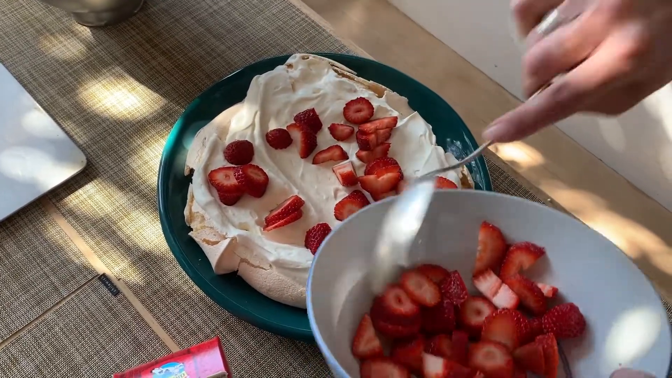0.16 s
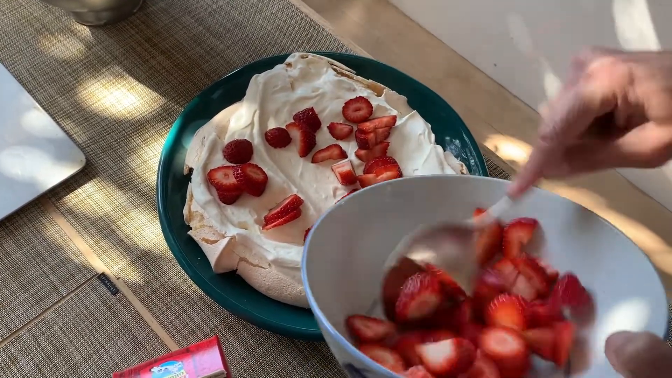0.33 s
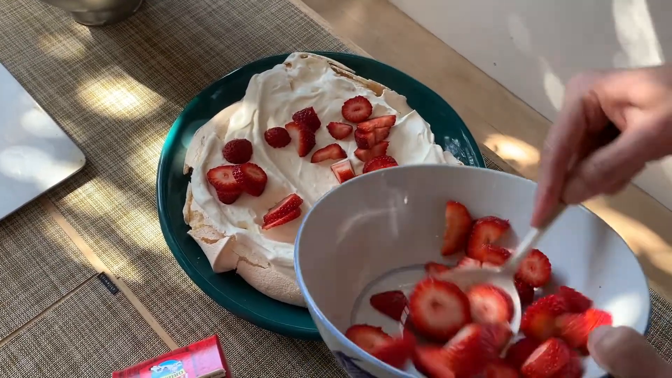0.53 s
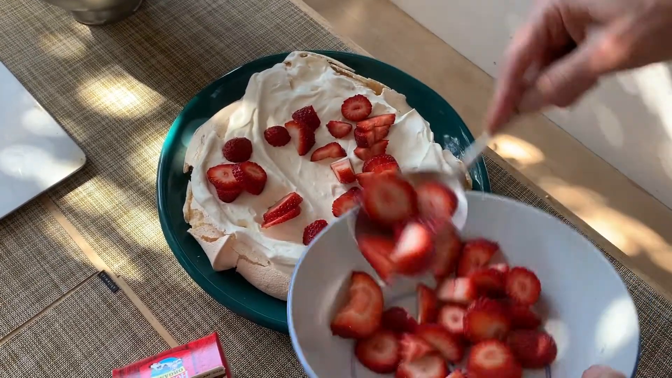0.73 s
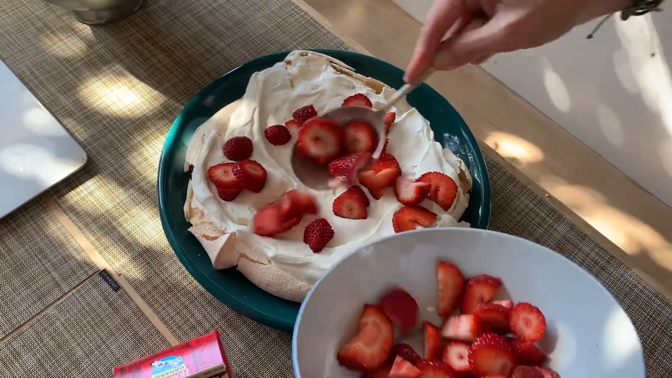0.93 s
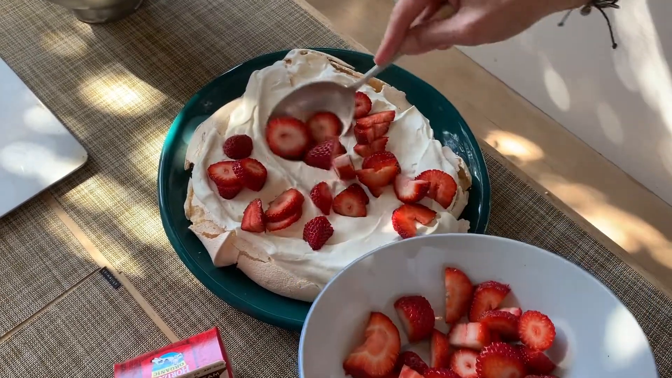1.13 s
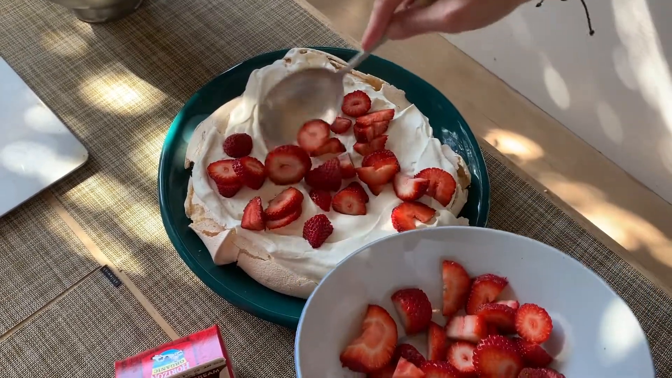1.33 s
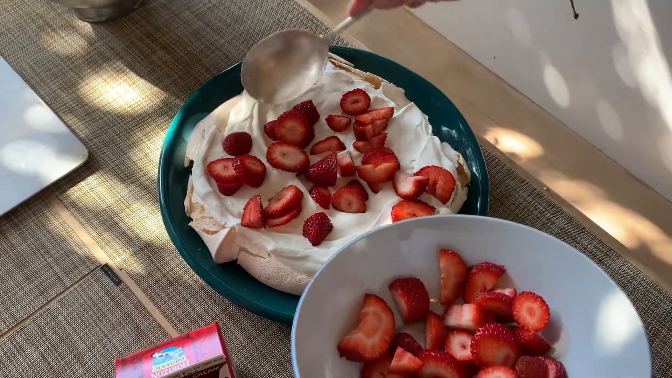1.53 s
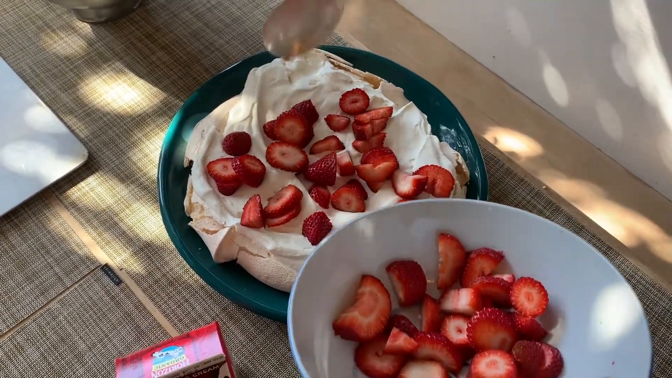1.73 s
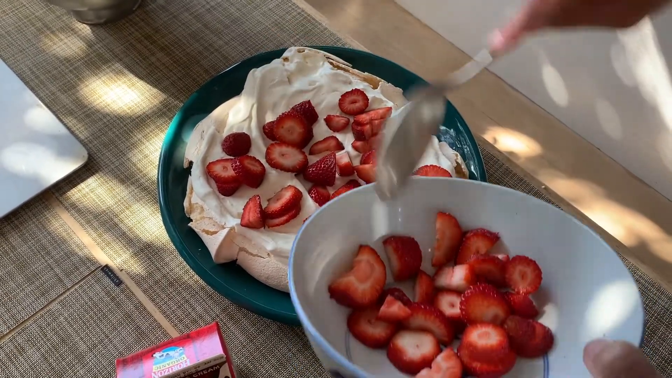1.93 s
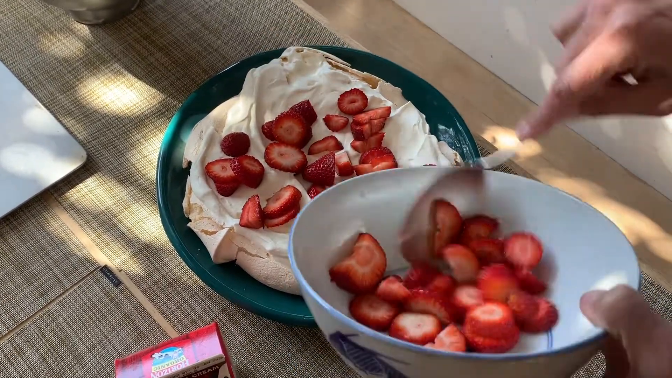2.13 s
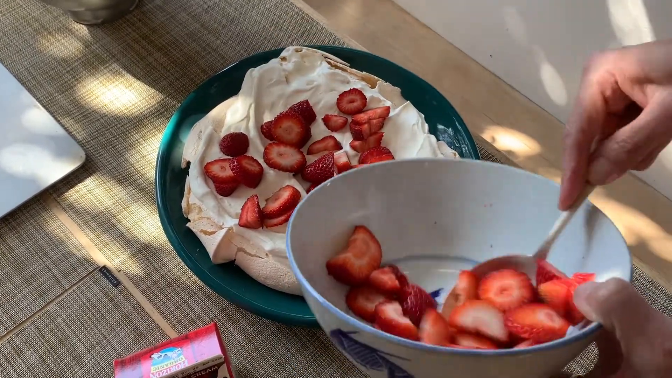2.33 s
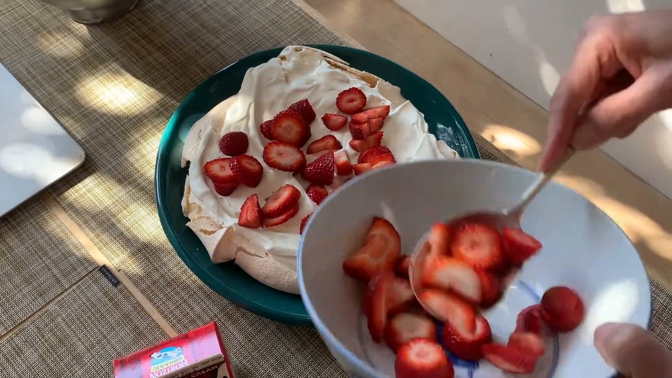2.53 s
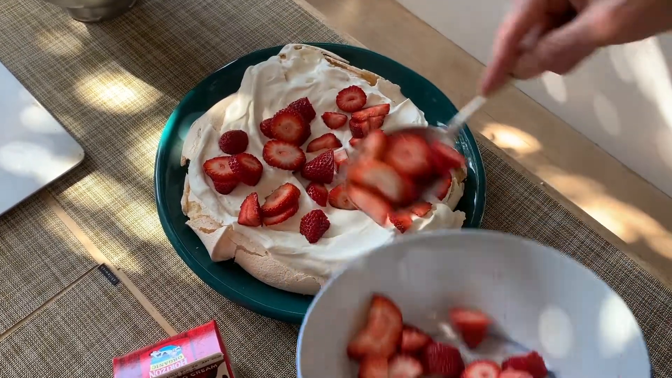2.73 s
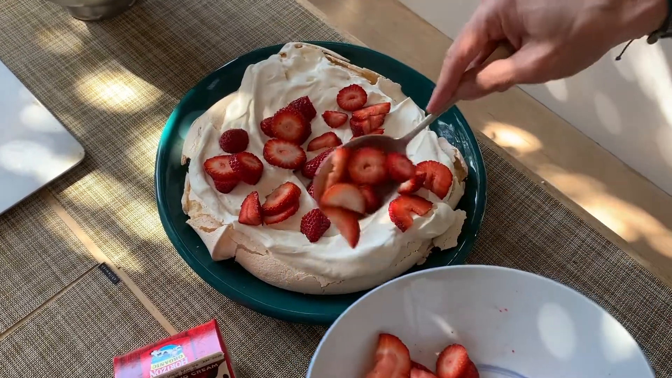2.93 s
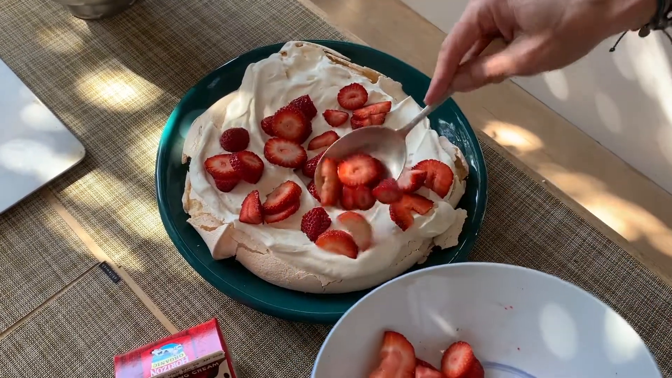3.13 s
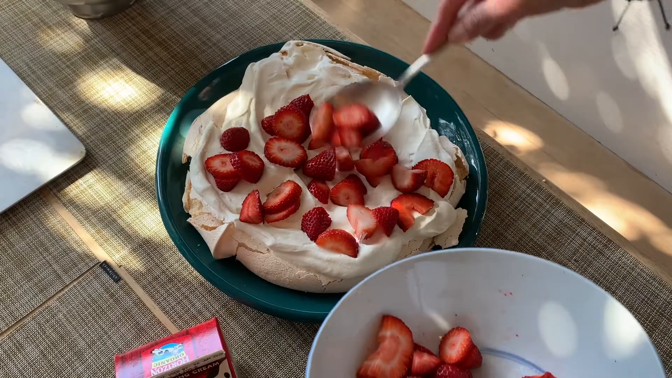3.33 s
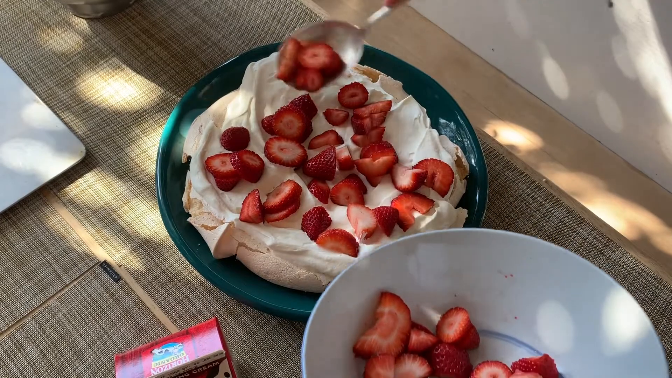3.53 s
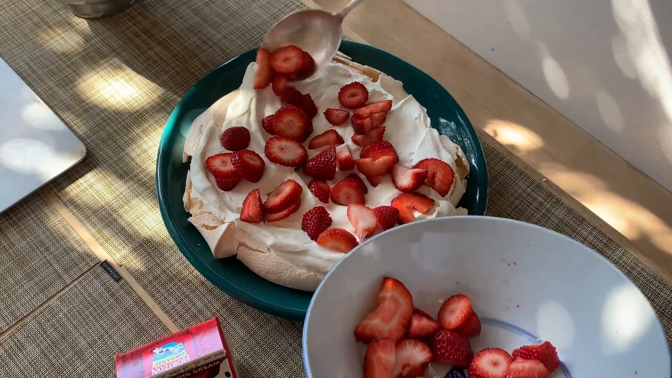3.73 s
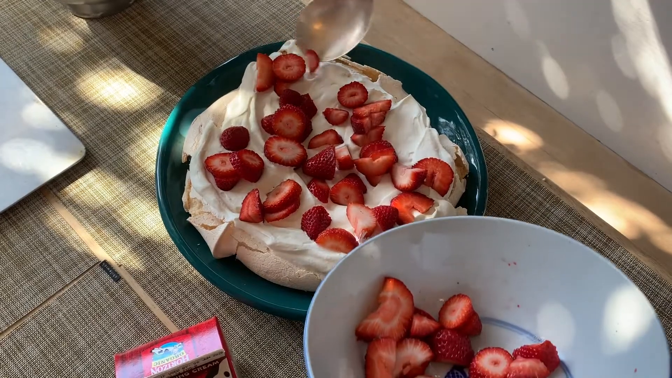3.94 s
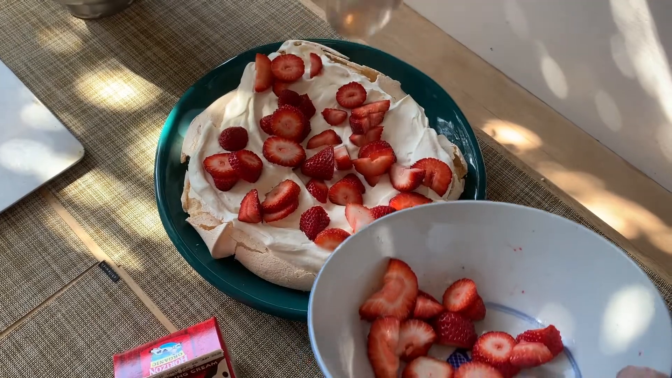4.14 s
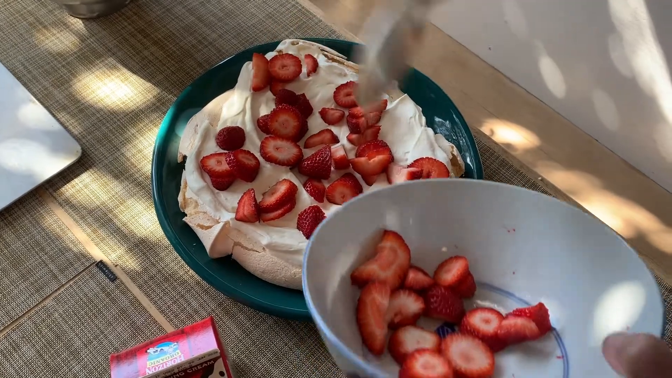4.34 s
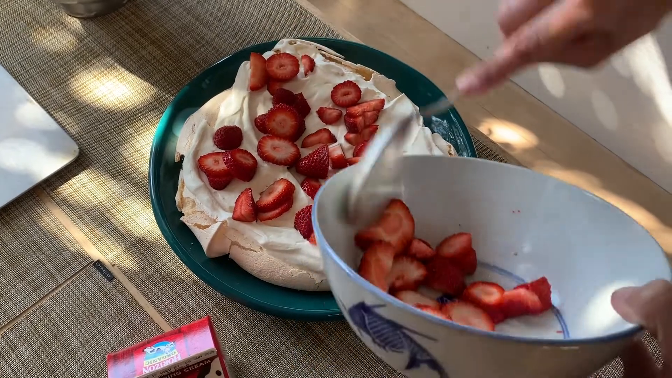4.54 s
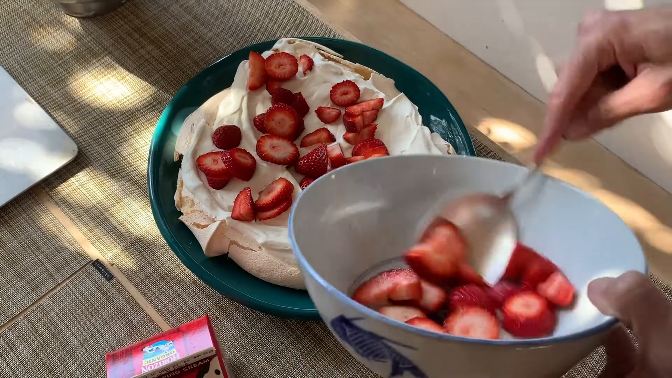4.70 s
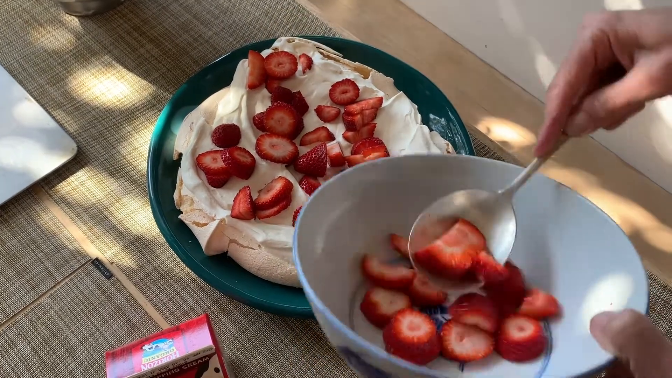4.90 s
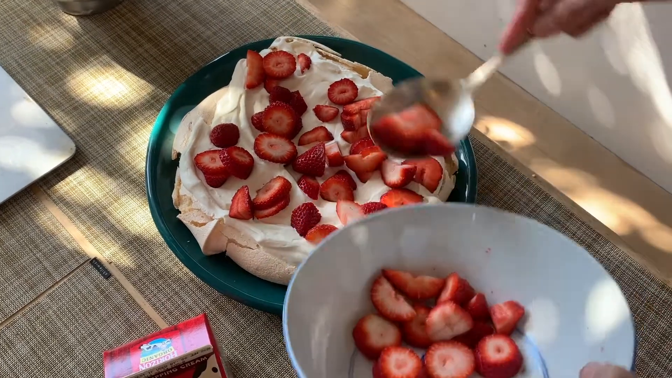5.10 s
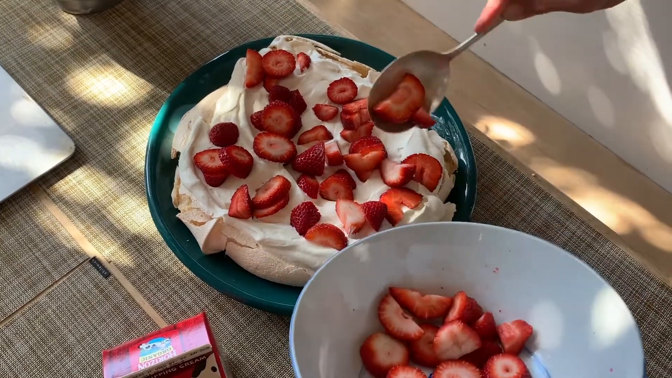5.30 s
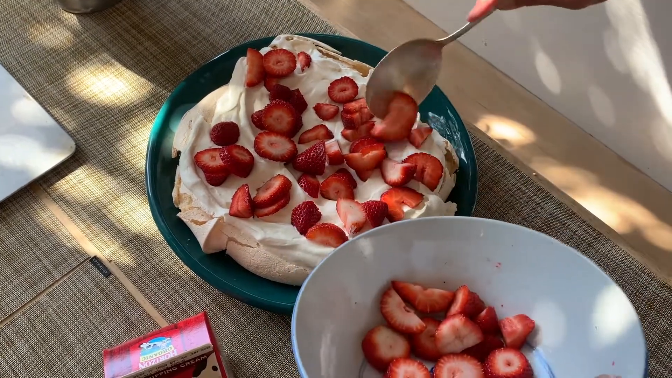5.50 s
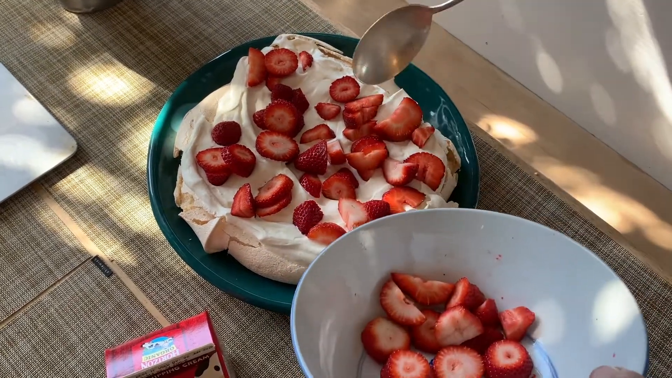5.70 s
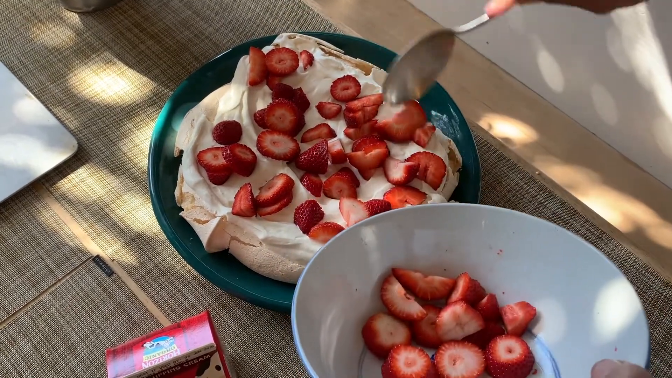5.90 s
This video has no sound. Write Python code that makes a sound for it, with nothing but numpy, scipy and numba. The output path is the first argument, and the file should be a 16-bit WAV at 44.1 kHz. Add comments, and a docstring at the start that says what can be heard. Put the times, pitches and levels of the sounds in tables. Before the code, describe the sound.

Low appliance hum and dull room air run throughout. A spoon hits a ceramic bowl with a quick cluster of bright clinks, slides grittily and knocks the bottom; after a pause this repeats twice, the bowl ringing clearly but damped by hand and fruit. Barely audible wet ticks and soft taps fall between. Near stereo pickup, with a small hard kitchen around it.

```python
"""A quiet kitchen, close to a hand-held ceramic bowl of cut fruit: a steel spoon dips in three times.
Each dip clinks in, slides and clinks out: blows and grit ring the damped modes of bowl and spoon, with snaps of noise.
Fruit and spoon tick faintly as noise puffs, slices drop on cream as dull decaying tones.
Behind them an appliance hums in wavering tones, and shaped noise is the room air.
Two microphone ports a few centimetres apart hear it, with the kitchen's short echo."""
import sys
import numpy as np
from scipy import signal
from scipy.fft import rfft, irfft, next_fast_len
from scipy.io import wavfile
from scipy.ndimage import uniform_filter1d
from numba import njit

SR = 44100
rng = np.random.default_rng(int(sys.argv[2]) if len(sys.argv) > 2 else 0)


def dump(signal):
    """Clip the signal to [-1, 1] and save it as 16-bit WAV at the path in sys.argv[1]."""
    limited = np.clip(np.atleast_2d(signal).T, -1, 1)
    pcm = np.round(limited * 32767).astype(np.int16)
    wavfile.write(sys.argv[1], SR, pcm)


N = 262836

# Centres of the zones in which the colour of a blow is given, in Hz.
ZONES_HZ = [720, 1460, 2476, 3700, 5100, 6700, 8600, 10500, 12600, 15000]
# Spoon blows on the bowl. Each row: start in seconds, relative level in dB, spot from wall 0 to floor 1,
# angle around the bowl in degrees, dB by which the bowl rings along, brightness in dB per octave.
CLINKS = [(.2525, -18, 0.33, 12, -1.5, 0), (.2635, -4.5, .2, 52, -9.5, 2.5),
          (.2757, -11.5, .3, 52, -3, 1.5), (.3098, -20, 0.81, 55, -10.5, 1.5),
          (.3925, -16, 1, 14, -4.5, -0.7), (.4282, -30.5, .2, 34, -2, 0.1),
          (.4995, -48, 0.51, 85, -1.5, .3), (2.0625, -8, 0.055, 32, 4.5, -1.5),
          (2.0733, -2, .05, 38, -1, -0.24), (2.0787, -10.5, .05, 29, 0.45, -1),
          (2.174, -30, .9, 35, 1.5, 1.5), (2.2071, -6.5, 0.67, 15, 5, -0.48),
          (2.284, -34, .5, 20, -4.5, 0.5), (4.5295, 1, 0.058, 67.7, 3, 0), (4.540, -7, 0.11, 67, 7.5, 1.05),
          (4.6703, -5, 0.73, 54, -0.85, -0.07), (4.7501, -35, .5, 55, 4, 2.2)]
# Faint ticks of fruit and spoon. Each row: start in seconds, rough peak in dB, centre in Hz,
# t60 in seconds, dB by which the spoon rings along.
TICKS = [(0.5164, -56.5, 4000, 0.014, -9.5), (.546, -48.5, 11000, 0.0088, -26),
         (0.569, -58.5, 10070, .008, -25.5), (.6264, -64, 13000, 0.012, -30),
         (0.6466, -54, 5000, 0.0099, -30), (.6614, -66, 7000, .01, -30), (.7744, -50.5, 13050, 0.011, -29),
         (.781, -56.5, 5060, 0.028, -33), (0.8015, -53, 12000, 0.0073, -36),
         (0.8727, -55.5, 4100, 0.03, -18), (0.8844, -49, 9000, 0.013, -38), (0.9417, -47, 9150, 0.041, -37),
         (0.958, -46.5, 13100, 0.04, -34), (1.0038, -54, 2220, 0.037, -33), (1.01, -62, 9000, .02, 0.5),
         (1.136, -78, 11000, .01, 3), (1.205, -75.5, 12280, .01, -4), (1.341, -55, 1850, 0.27, -28),
         (2.466, -64, 3800, .02, -30), (2.473, -56, 12960, .008, -35), (2.485, -55, 8170, 0.022, -13.5),
         (2.562, -68, 7010, 0.014, -31.5), (2.597, -57.5, 9100, 0.023, -32), (2.6594, -64, 6000, 0.01, -30),
         (2.679, -55, 9000, 0.014, -34), (3.0694, -69.5, 7000, 0.01, -8),
         (3.2704, -62.5, 3600, 0.016, -30.5), (3.499, -72.5, 10290, 0.013, -4),
         (3.9546, -62.5, 5020, 0.015, -29.5), (4.8964, -57, 10900, 0.011, -30),
         (4.923, -54.5, 7730, 0.023, -9), (5.044, -56, 9000, .012, -30.5),
         (5.0602, -53.5, 10800, 0.027, -31), (5.5162, -66, 5000, 0.015, -25)]


def amp(db):
    """Decibels to gain."""
    return 10 ** (np.asarray(db) / 20)


def evened(x):
    """Scales to rms 1."""
    return x / np.sqrt(np.mean(x ** 2) + 1e-20)


def read(points, hz):
    """Reads a table on a log-frequency axis."""
    f, value = np.transpose(points)
    return np.interp(np.log(hz + 1), np.log(f + 1), value)


def add(mix, s, sound):
    """Mixes a sound in at a time in seconds."""
    part = mix[round(s * SR):][:len(sound)]
    part += sound[:len(part)]


def air(level_db=-59, patch_db=0.84):
    """Room air: random short-time spectra with drifting patches, less alike at the two ports in some bands."""
    # Colour of the air. Each row: frequency in Hz, relative level in dB per Hz.
    air_colour = [(20, -38), (36, -28.5), (52, -11), (165, -10.5), (224, -7.5), (289, -11), (404, -13),
                  (583, -21), (994, -26), (1900, -39), (4000, -46.5), (6900, -50), (10500, -49),
                  (15500, -54)]
    # Each row: frequency in Hz, left-right likeness from -1 to 1.
    likeness = [(60, 0.61), (180, 0.79), (550, 0.22), (1650, 0.03), (4970, -0.33), (15000, -0.66)]
    frames, hz = N // 512 + 5, np.fft.rfftfreq(2048, 1 / SR)
    a, b, c, d, patches = rng.standard_normal((frames, 1025, 5)).T
    patches = uniform_filter1d(patches, 30, 0)  # across frequency
    patches = evened(uniform_filter1d(patches, 10, 1))  # across time
    same = np.clip(read(likeness, hz), -1, 1)[:, None]
    left = a + 1j * b
    right = same * left + np.sqrt(1 - same ** 2) * (c + 1j * d)
    gain = amp(read(air_colour, hz)[:, None] + patch_db * patches)
    noise = signal.istft(np.array([left, right]) * gain, nperseg=2048, noverlap=1536)[1][:, :N]
    return amp(level_db) * evened(noise)


def hum(steady=2.1):
    """Appliance motor: each tone is a steady part plus narrow noise, so it wavers in level and phase."""
    # Each row: frequency in Hz, rms level in dB, width of the wavering part in Hz.
    motor_tones = [(57.5, -68.5, 1.5), (119.4, -68, 2.2), (159.3, -70.5, 6.3), (173, -78, 4.1),
                   (218.9, -59, 2.7), (241.2, -71, 4), (380, -78.5, 4.2), (412, -75, 5.8)]
    t, out = np.arange(N) / SR, np.zeros(N)
    for hz, db, width_hz in motor_tones:
        pole = np.exp(-np.pi * width_hz / SR)
        noise = rng.standard_normal(N) + 1j * rng.standard_normal(N)
        wobble = signal.lfilter([1], [1, -2 * pole, pole * pole], noise)
        envelope = steady + wobble / np.std(wobble)
        out += amp(db) * evened((envelope * np.exp(2j * np.pi * hz * t)).real)
    return out


def kitchen(x):
    """Echo of the kitchen: sparse taps of random sign, each band dying at its own speed."""
    # Each row: frequency in Hz, t60 in seconds.
    decay_s = [(300, 0.31), (1500, 0.87), (4000, 0.33), (9000, 0.15), (16000, 0.22)]
    # Each row: frequency in Hz, relative level of the echo in dB.
    echo_db = [(300, -9.5), (1500, -21.5), (2500, -17), (5000, -3.5), (10000, -11), (16000, -7)]
    taps = np.zeros((2, SR // 2))
    grid = np.arange(160, SR // 2 - 20, 20)  # samples; the first tap comes after 3.6 ms
    at = grid + rng.integers(0, 20, (2, len(grid)))
    np.put_along_axis(taps, at, rng.choice([-1., 1.], at.shape), 1)
    hz, t, z = signal.stft(taps, SR, nperseg=256)
    gain_db = read(echo_db, hz)[:, None] - 60 * t / read(decay_s, hz)[:, None]
    tail = signal.istft(z * amp(gain_db), SR, nperseg=256)[1]
    return signal.fftconvolve(x[None], tail / 8, axes=1)[:, :N]


def thuds():
    """Soft knocks of fruit and hand: a single dull pitch that swells in half a cycle and dies away."""
    # Each row: start in seconds, level in dB, pitch in Hz, t60 in seconds.
    knocks = [(.254, -36.5, 836, 0.089), (.392, -29, 951, 0.021), (.52, -38, 660, 0.013),
              (.874, -51, 779, 0.035), (0.887, -40, 764, 0.021), (0.943, -34.5, 294, 0.035),
              (0.96, -33, 293, 0.032), (2.065, -41.5, 249.2, 0.071), (2.205, -21, 802, 0.019),
              (4.535, -34.5, 60.2, 0.074), (4.671, -21.5, 738, 0.022), (4.895, -46.5, 750, 0.028)]
    out, t = np.zeros(N), np.arange(SR // 4) / SR
    for s, db, hz, t60 in knocks:
        swell = 1 - np.exp(-t * hz * 2)
        add(out, s, amp(db - 60 * t / t60) * np.sin(2 * np.pi * hz * t) * swell)
    return out


def rubbing(edge_s=0.0077, grains_per_s=5000):
    """Random grains of uneven size under the sliding spoon; returns them with the slide's dullness."""
    # Spoon sliding under the fruit, then fruit settling. Each row: start in seconds, length in seconds,
    # relative level in dB, fade in dB per second, dullness in dB per octave.
    slides = [(0.295, 0.087, -31, 125, -2.5), (0.409, 0.22, -42, 181, 6), (0.61, 0.18, -69.5, 3, 6.5),
              (0.936, 0.082, -55.5, 300, 7.5), (0.996, .085, -56.5, 300, 9.5),
              (2.097, 0.13, -34.5, 33, -0.2), (2.224, 0.1, -33, 203, -4.5), (2.327, 0.27, -64, 31, 6),
              (4.55, 0.14, -26.5, 168, -1), (4.71, 0.076, -40, 25, -2.5), (4.775, 0.22, -59.5, 27, 7)]
    t, level, dull = np.arange(N) / SR, np.zeros(N), np.zeros(N)
    for s, length, db, fade_db, slope in slides:
        inside = np.clip(np.minimum(t - s, s + length - t) / edge_s, 0, 1)
        level += inside * amp(db - fade_db * (t - s).clip(0, length))
        dull[inside > 0] = slope
    grain_size = amp(3.0 * np.minimum(rng.exponential(1, N), 5))
    hits = rng.random(N) < grains_per_s / SR
    grit = rng.standard_normal(N) * grain_size * hits
    return evened(grit) * level, dull


def hiss(grit, dull):
    """What the slide radiates between the modes: the grit, tilted by its dullness and thinned in the bass."""
    hz, _, z = signal.stft(grit, SR, nperseg=256)
    slope = np.interp(np.arange(z.shape[1]) * 128, np.arange(N), dull) + 0.49  # dB per octave
    z = z * amp(-np.outer(np.log2((hz + 200) / 5000), slope))
    z = z * np.minimum(hz / 1500, 1)[:, None]
    return amp(-6.5) * signal.istft(z, SR, nperseg=256)[1][:N]


def colour_of(spot, bright_db):
    """Colour of a blow in dB per zone, between wall and floor, tilted by its hardness."""
    # Blow on the wall and on the floor of the bowl, one level in dB for each zone.
    wall_db = [-28.5, -26, -23, -17, -20.5, -25.5, -17.5, -20, -21.5, -20]
    floor_db = [-23, -21.5, -26.5, -19.5, -18.5, -12, -22, -14.5, -25.5, -20.5]
    tilt_db = bright_db * np.log2(np.array(ZONES_HZ) / 5000)
    return (1 - spot) * np.array(wall_db) + spot * np.array(floor_db) + tilt_db


def burst(colour, t60, size=2048):
    """A sudden puff of noise of a given colour, peak near 1, dying away exponentially."""
    spectrum = rfft(rng.standard_normal(size))
    noise = evened(irfft(spectrum * colour(np.fft.rfftfreq(size, 1 / SR))))
    t = np.arange(size) / SR
    attack = np.minimum(t / 0.00035, 1)
    return noise / 2 * amp(-60 * t / t60) * attack


def cracks(crack_db=-5.5, t60=0.051):
    """The wide-band snap of steel on glaze, and the small ticks, as puffs of coloured noise."""
    out = np.zeros(N)
    zone_width_db = 10 * np.log10(np.gradient(ZONES_HZ) / 1000)
    for s, db, spot, _, _, bright_db in CLINKS:
        per_hz = list(zip(ZONES_HZ, colour_of(spot, bright_db) - zone_width_db))
        snap = burst(lambda hz: amp(read(per_hz, hz)) * np.minimum(hz / 600, 1) ** 2, t60)
        add(out, s, amp(db + crack_db) * snap)
    for s, db, centre_hz, tick_t60, _ in TICKS:
        tick = burst(lambda hz: amp(-6 * np.log2((hz + 1) / centre_hz) ** 2), max(tick_t60, .003))
        add(out, s, amp(db) * tick)
    return out


def damping(press_s=0.015, press_damping=9):
    """How many times faster than free each group of bowl modes dies, sample by sample."""
    # Touch of spoon, fruit and fingers. Each row: moment in seconds from which it holds, then how many
    # times faster the two deep rim modes die, the third one, and the higher ones.
    grip = [(.25, .7, 1.47, 2.4), (.396, 1.2, 6.2, 4), (2.06, 2.8, 3.5, 2.55), (2.12, 2.5, 1.5, 1.4),
            (2.208, 1.09, 1.49, 3.6), (4.52, 2.8, 4.1, 4.9), (4.61, 1.5, 2.5, 1.5), (4.672, 0.96, 2.5, 2.6),
            (4.72, 0.35, 2.4, 1.2), (4.829, 1, 1.4, 1.9)]
    # Knocks on the floor in seconds; the spoon presses there just before, and stops the ring.
    lifts_s = [.3925, 2.2071, 4.6703]
    t, (s, *loads) = np.arange(N) / SR, np.transpose(grip)
    now = (np.searchsorted(s, t) - 1).clip(0)
    pressed = sum((t > lift - press_s) & (t < lift) for lift in lifts_s)
    return [(column[now] + press_damping * pressed).clip(.2, 40) for column in loads]


@njit
def ring(force, turn, swell, keep):
    """One mode: the force is smoothed by the swell, then rings with a loss that changes in time."""
    out, a, b = np.zeros(len(force)), 0j, 0j
    for n in range(len(force)):
        a = a * turn * swell + (1 - swell) * force[n]
        b = b * turn * keep[n] + a
        out[n] = b.imag
    return out


def modes(grit, dull, blow_db=-0.5, rub_db=-42.5, scatter_db=4.0, touch_db=4.9, node_leak=0.14):
    """Clinks and grit push every mode of bowl and spoon; a light touch rings only the spoon's freest modes."""
    # The wide rim modes build up over some cycles.
    # Each row: frequency in Hz, relative level in dB, free t60 in seconds, swell in seconds.
    bowl = [(723, -7.5, 0.52, .012), (1460.5, 0, 0.59, 0.004), (2476, 7.5, 0.45, 0.0025),
            (2956, -10, 0.34, 0.00093), (3015, -13.5, 0.073, 0.0011), (3570, -3, 0.11, 0.0017),
            (3744, 1.5, 0.45, 0.003), (4430, -9.5, 0.064, 0.00075), (4080, -17.5, 0.32, 0.00066),
            (4290, -4, 0.32, 0.0017), (5100, -8, 0.16, 0.0014), (5694, -13.5, 0.017, .001),
            (3730, -4, 0.068, 0.0021), (870, -3, 0.12, 0.0009), (2270, -15.5, 0.042, 0.00083)]
    # Each row: frequency in Hz, relative level in dB, t60 in seconds.
    spoon = [(6480, -3, .1), (6600, -3, .12), (6780, -2, .13), (7020, -4, .11), (7240, -5, .09),
             (7610, -9, .07), (8000, -4, .08), (8590, -1, .11), (8850, -7, .06), (9100, -6, .06),
             (9300, -6, .07), (9680, -6, .08), (9930, -4, .08), (10240, -3, .08), (10550, -2, .08),
             (10980, -1, .07), (11200, -5, .08), (11420, -4, .08), (12250, -6, .07), (12600, -3, .08),
             (12900, -5, .06), (13600, -4, .05), (14120, -6, .06), (14630, -6, .06), (15050, -3, .06),
             (15350, -5, .05)]
    # Spoon modes that the grip of the hand leaves free, in Hz.
    free_hz = [6780, 8590, 10240, 12600, 15050]
    # Row of the bowl table, to the number of waves around the rim.
    rim_lobes = {0: 2, 1: 3, 2: 4, 6: 5}
    clinks, ticks, out = np.array(CLINKS), np.array(TICKS), np.zeros(N)
    clink_at = np.round(clinks[:, 0] * SR).astype(int)
    tick_at = np.round(ticks[:, 0] * SR).astype(int)
    deep, third, high = damping()
    table = bowl + [row + (.0003,) for row in spoon]
    luck = rng.standard_normal((len(clinks), len(table), 2))  # level scatter, sign
    luck[:, list(rim_lobes)] = [0, 1]  # the rim modes answer by the angle alone
    touch = touch_db * rng.standard_normal((len(ticks), len(table)))
    for k, (hz, db, t60, swell) in enumerate(table):
        steel = k >= len(bowl)
        # fine grit barely moves the rim
        force = grit * amp(rub_db - dull * np.log2(hz / 5000)) * min(hz / 5000, 1) ** 2

        colour = np.array([read(list(zip(ZONES_HZ, colour_of(*row))), hz) for row in clinks[:, [2, 5]]])
        if not steel:
            colour = colour + clinks[:, 4]
        size = amp(blow_db + clinks[:, 1] + colour + scatter_db * luck[:, k, 0]) * np.sign(luck[:, k, 1])
        # a rim mode struck on its node still gets the leak
        size *= np.hypot(np.cos(rim_lobes.get(k, 0) * np.radians(clinks[:, 3])), node_leak)
        force[clink_at] += size

        free = min(abs(np.log(hz / np.array(free_hz)))) < .008
        force[tick_at] += free * amp(ticks[:, 1] + ticks[:, 4] + touch[:, k])

        if steel:
            load = np.ones(N)
        else:
            load = deep if k < 2 else third if k == 2 else high
        loss = np.log(1000) / (t60 * SR) * load
        turn = np.exp(2j * np.pi * hz / SR)
        out += amp(db) * ring(force, turn, np.exp(-1 / (swell * SR)), np.exp(-loss))
    return out


def ports(x, dip_hz=12140, dip_width_hz=98, dip_db=-12.5):
    """The two ports hear a near source with a different phase and level."""
    # Each row: frequency in Hz, radians by which the right port leads.
    lead = [(600, 0), (760, -.4), (1460, 2.2), (1700, 2.2), (2100, -.3), (2476, -.2), (3000, .4),
            (3700, 1.5), (4300, 2), (5000, 4.2), (6300, 6.8), (7000, 8.1)]
    # Each row: frequency in Hz, left minus right in dB.
    left_over_right = [(500, 1), (720, -1), (1460, -3), (2476, -2.5), (4000, -3), (5700, -4), (7000, 0)]
    size = next_fast_len(N + 4096)
    hz = np.fft.rfftfreq(size, 1 / SR)
    # a narrow dip where the table's echo cancels the near sound
    z = rfft(x, size) * amp(dip_db * np.exp(-((hz - dip_hz) / dip_width_hz) ** 2))
    tilt = amp(read(left_over_right, hz) / 2)
    left = z * tilt
    right = z / tilt * np.exp(1j * read(lead, hz))
    return irfft(np.array([left, right]), size)[:, :N]


def scene():
    """Bowl and spoon close to the microphone ports, the kitchen around them."""
    grit, dull = rubbing()
    near = modes(grit, dull) + cracks() + thuds() + hiss(grit, dull)
    return air() + hum() + kitchen(near) + ports(near)


def record(dry, lag_s=0.0001795, shared_hz=7500, edge_hz=15650):
    """In the treble both ports carry one signal, the left one late; loud peaks round off; then a low-pass."""
    size = next_fast_len(N + 4096)
    hz = np.fft.rfftfreq(size, 1 / SR)
    left, right = rfft(dry, size)
    shared = np.clip((hz - shared_hz) / 600 + .5, 0, 1) * np.pi / 2  # crossfade angle
    early_left = left * np.exp(2j * np.pi * hz * lag_s)
    right = np.cos(shared) * right + np.sin(shared) * early_left
    pair = np.tanh(irfft(np.array([left, right]), size)[:, :N])
    low_pass = signal.firwin(111, edge_hz, window=("kaiser", 9), fs=SR)
    return signal.oaconvolve(pair, low_pass[None], "same")


dry = scene()
out = record(dry)
dump(out)
```